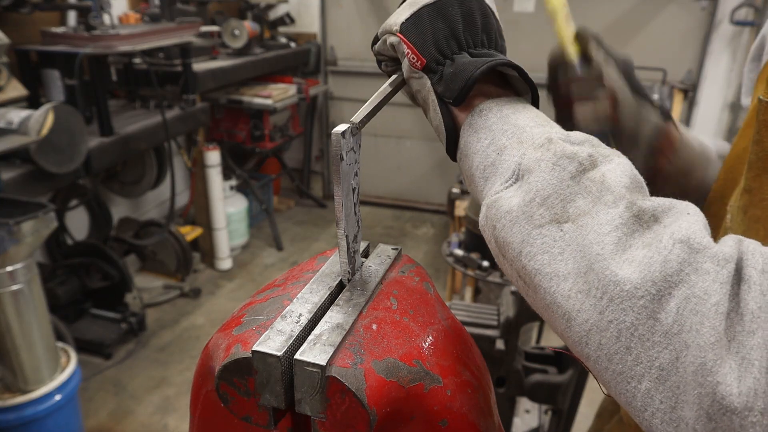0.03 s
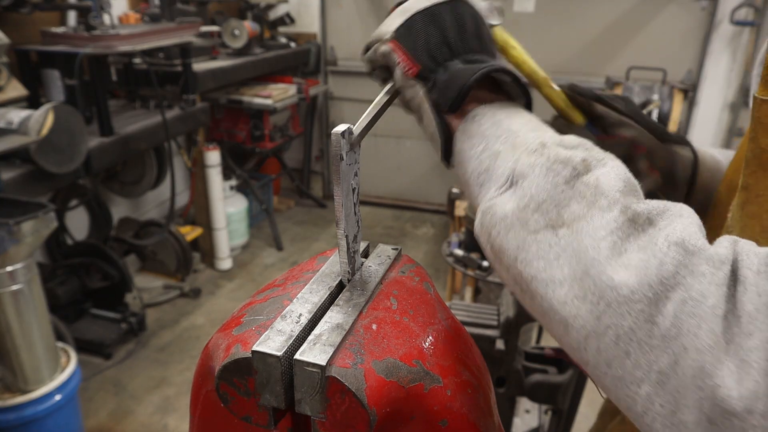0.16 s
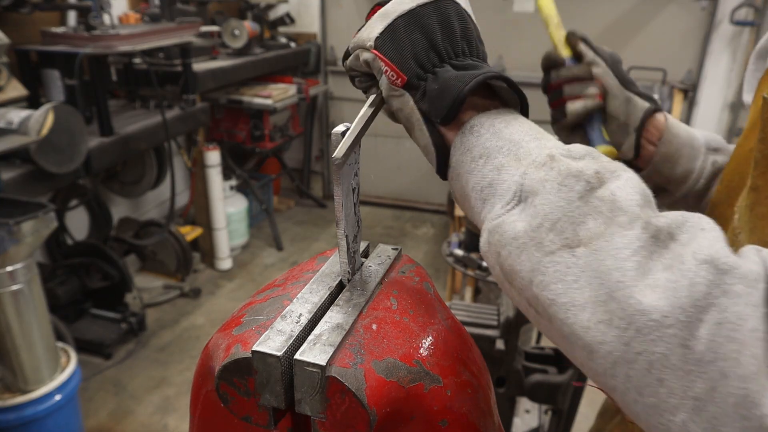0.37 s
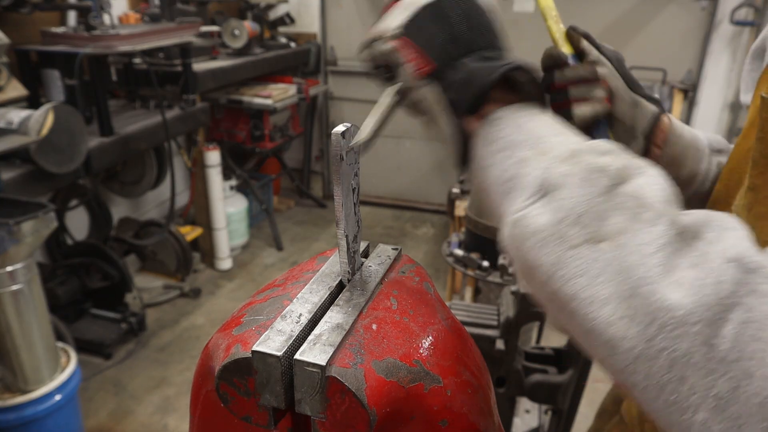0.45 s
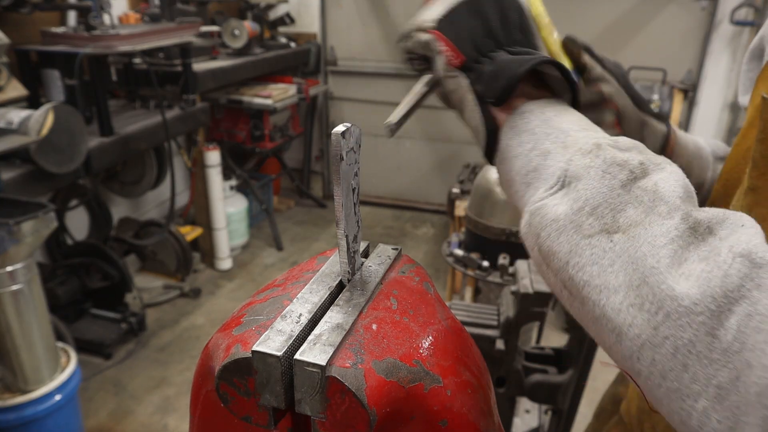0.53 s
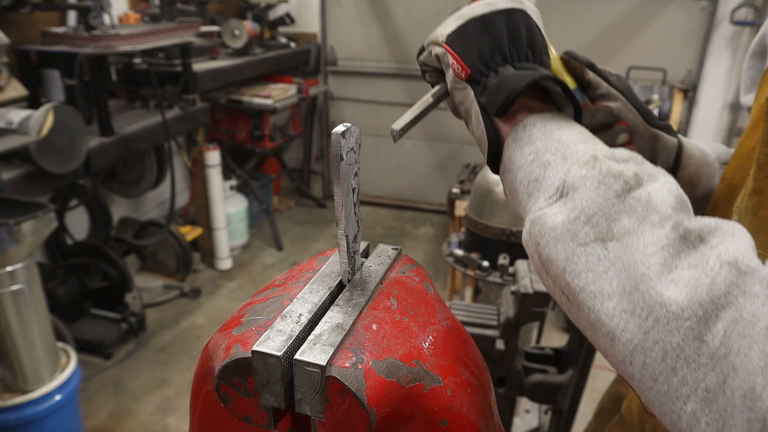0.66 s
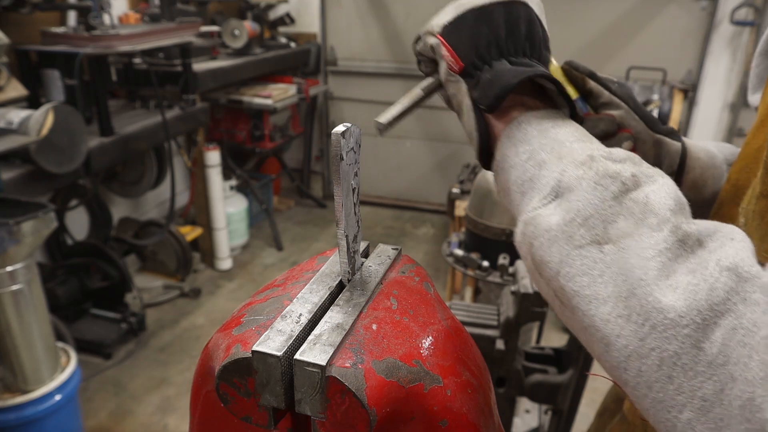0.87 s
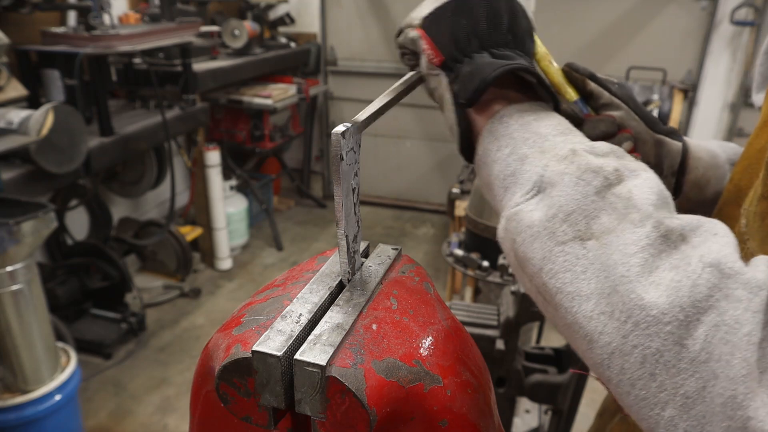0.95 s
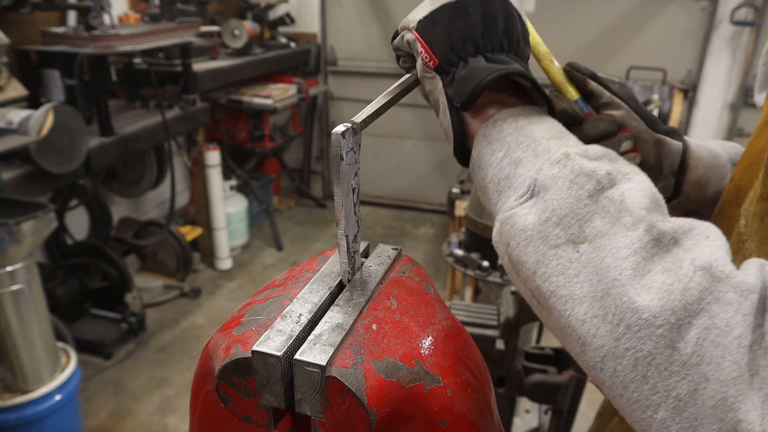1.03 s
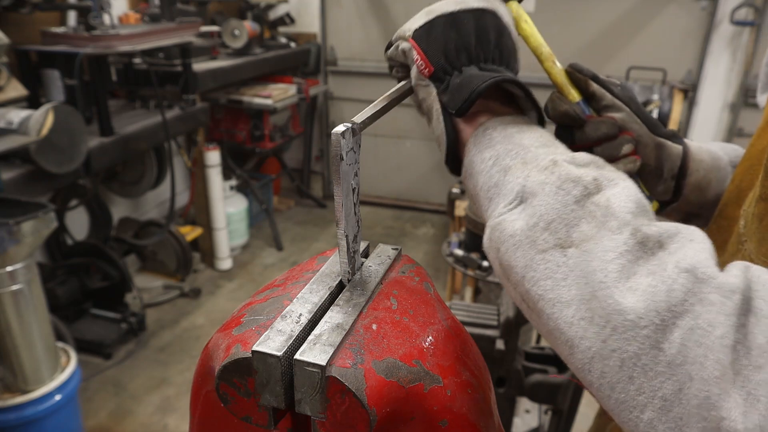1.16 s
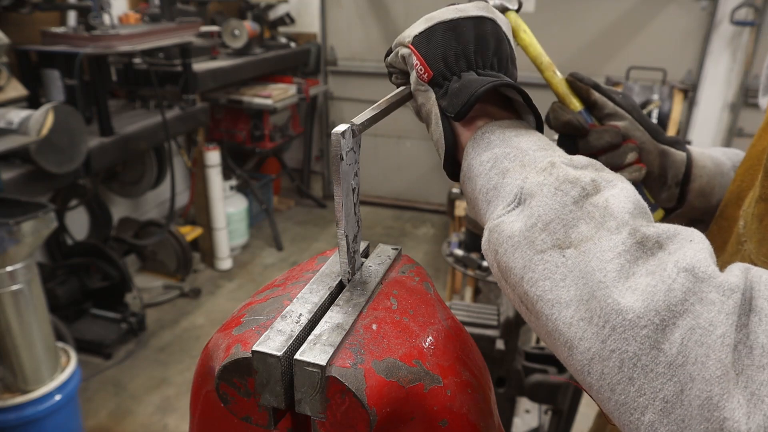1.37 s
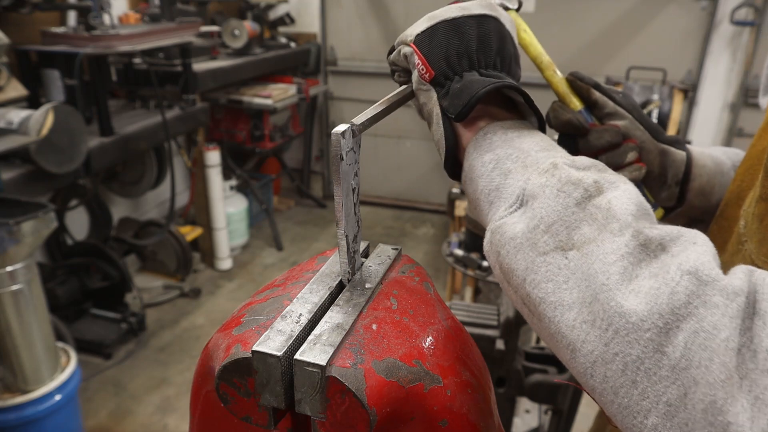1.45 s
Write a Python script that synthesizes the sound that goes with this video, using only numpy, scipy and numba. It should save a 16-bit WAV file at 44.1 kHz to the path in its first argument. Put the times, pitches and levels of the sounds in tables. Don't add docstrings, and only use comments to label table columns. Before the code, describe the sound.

A single hard hammer blow on a chisel against vise-held steel, close and slightly overloaded, rings into a concrete garage; about a second later come a soft knock and a sharper light tap over low hum.

```python
import sys
import numpy as np
from scipy import signal
from scipy.fft import rfft, irfft
from scipy.io import wavfile
from numba import njit

SR = 44100
rng = np.random.default_rng(int(sys.argv[2]) if len(sys.argv) > 2 else 0)


def gain_from_db(level_db):
    decades = np.asarray(level_db, float) / 20
    return 10 ** decades


def output_pcm(signal):
    pcm = np.clip(np.atleast_2d(signal).T, -1, 1) * 32767
    wavfile.write(sys.argv[1], SR, np.round(pcm).astype(np.int16))


N = 66150
T = np.arange(N) / SR

# (t/s, crack level/dB, contact time/s, ring level/dB, room level/dB)
HITS = [
    (0.2041, 13, .0002, -2, -8),
    (1.0722, -26.5, 0.00037, -34, -40.5),
    (1.3034, -11, 0.00027, -34, -37),
]
RING_RISE_S = 0.0021


def curve(points, hz):
    p = np.array(points, float)
    return np.interp(np.log(np.maximum(hz, 1)), np.log(p[:, 0]), p[:, 1])


def colour(points, hz=None, octaves=None):
    f = np.fft.rfftfreq(N, 1 / SR)
    spectrum = rfft(rng.standard_normal(N)) * gain_from_db(curve(points, f))
    spectrum = spectrum / np.std(irfft(spectrum, N))
    if hz:
        distance = np.clip(np.log2((f + 1) / hz) / octaves, -1, 1)
        spectrum = spectrum * np.cos(np.pi / 2 * distance)
    return irfft(spectrum, N)


def fade(start, t60, rise):
    age = np.maximum(T - start, 0)
    return (1 - np.exp(-(age / rise) ** 2)) * 10 ** (-3 * age / t60)


def ring(start, modes, rise, spread_hz=0., count=1):
    partner_db = -2.5
    out, age = 0, T - start
    weight = np.where(np.arange(count) == 0, 1, gain_from_db(partner_db))[:, None]
    for hz, db, t60 in modes:
        detune, phase = rng.random((2, count, 1))
        offset = spread_hz * (1 + hz / 1000) * (detune - .5) * (weight != 1)
        cycles = (hz + offset) * age + phase * (count > 1)
        tone = (weight * np.sin(2 * np.pi * cycles)).sum(axis=0)
        out = out - gain_from_db(db) * fade(start, t60, rise) * tone / np.sqrt(count)
    return out


def puffs(rows, octaves):
    flat = [(20, 0), (20000, 0)]
    out = 0
    for s, db, hz, length in rows:
        swell = np.exp(-((T - s) / length) ** 2)
        noise = colour(flat, hz, octaves) / np.sqrt(hz * octaves / 32000)
        out = out + gain_from_db(db) * swell * noise
    return out


def garage():
    # (f/Hz, level/dB per Hz)
    floor_colour = [(18, -38), (30, -25), (64, 1.5), (93, -14), (597, -17), (1350, -21.5), (1750, -24),
                    (15800, -40)]
    # (f/Hz, level/dB before a common lift of 8.5 dB)
    hum_tones = [(59.2, -71.5), (183.0, -88), (317.6, -82), (608.3, -84)]
    floor_db = -61.5
    out = gain_from_db(floor_db - 4) * colour(floor_colour)
    for hz, db in hum_tones:
        out = out + gain_from_db(db + 8.5) * np.sin(2 * np.pi * (hz * T + rng.random()))
    return out


def stand():
    # (f/Hz, level/dB, t60/s)
    slow_modes = [(132.8, -45.5, 3), (190, -40.5, 3), (841.6, -38, 2.4), (992, -43, 0.3), (1680, -50, 1.2)]
    earlier_blow_s, earlier_db, rise_s = -.9, -10.5, 0.1
    earlier = gain_from_db(earlier_db) * ring(earlier_blow_s, slow_modes, rise_s)
    return earlier + ring(HITS[0][0], slow_modes, rise_s)


def swish():
    # (t/s, level/dB, f/Hz, length/s)
    whistles = [
        (0.07, -70, 1740, 0.052),
        (0.19, -64, 1968, 0.014),
    ]
    return puffs(whistles, 0.18)


def ticks():
    # (t/s, level/dB, f/Hz, length/s)
    cloth_ticks = [
        (0.1185, -60, 3860, 0.00034),
        (1.0722, -63, 8100, 0.00044),
        (1.0745, -57, 5300, 0.0016),
        (1.3018, -43, 5000, 0.00046),
        (1.3042, -57.5, 9900, 0.0013),
        (1.4695, -63.5, 10900, .002),
    ]
    return puffs(cloth_ticks, 1.0)


def reverb(start, room):
    # (f/Hz, t60/s)
    room_decay = [(100, .7), (300, .6), (1000, 0.5), (3000, 0.51), (6000, 0.43),
                  (9000, .3), (12000, .22), (15000, .16)]
    late_db, late_stretch = -26.5, 1.63
    out = 0
    for hz in 60 * 2 ** np.arange(0, 8.6, 1 / 2):
        t60 = curve(room_decay, hz)
        rise = 0.00067 + 2.3 / hz
        tail = fade(start, t60, rise) + gain_from_db(late_db) * fade(start, late_stretch * t60, rise)
        out = out + colour(room, hz, 1 / 2) * tail
    return out


def contact(hit, crack, modes, room):
    # (delay/s, level/dB)
    first_walls = [(.0045, -10.5), (.0092, -13.5), (.0145, -13.5)]
    echo_smear_s, echo_top_hz, ring_t60_max_s = 0.00079, 3000, .5
    s, crack_db, push, ring_db, room_db = hit
    short = [(hz, db, 2.78 / width) for hz, width, db in crack]
    echoes = 0
    for lag, db in first_walls:
        echoes = echoes + gain_from_db(db) * ring(s + lag, short, push + echo_smear_s, 100, count=2)
    dull_echoes = signal.lfilter(*signal.butter(2, echo_top_hz, fs=SR), echoes)
    cracks = ring(s, short, push) + dull_echoes
    held = [(hz, db, min(t60, ring_t60_max_s)) for hz, db, t60 in modes]
    steel = ring(s, held, RING_RISE_S, 22, count=4)
    return gain_from_db(crack_db) * cracks + gain_from_db(ring_db) * steel + gain_from_db(room_db) * reverb(s, room)


def blow():
    # (f/Hz, width/Hz, level/dB)
    crack = [(845, 110, -13.5), (1400, 620, -3.5), (2770, 300, -1), (3715, 150, -7.5), (4755, 200, -6.5),
             (6550, 310, -14.5), (6770, 290, -17.5), (8800, 810, -15.5), (14300, 730, -17.5)]
    # (f/Hz, level/dB, t60/s)
    modes = [(306, -18, 0.61), (429.2, -17, 0.46), (540.8, -4.5, 0.33), (900, -21, 0.32),
             (1000.5, -8, 0.76), (1035, -7, .55), (1290, -17.5, .5), (1493, -15.5, 0.4), (2066, -9.5, 0.63),
             (2188, -11, 0.46), (2366, -19, .4), (2896, -20.5, 0.49), (3480, -20.5, .4)]
    # (f/Hz, level/dB per Hz)
    room = [(50, -52.5), (130, -24), (293, -12), (1030, -6), (3090, -9.5), (6000, -27), (11000, -38),
            (15800, -40)]
    return contact(HITS[0], crack, modes, room)


def vise():
    pitches = (609, 732, 4500, 5990, 7200)
    decays = (.65, .4, .55, .45, .25)
    # (level/dB, one column per pitch)
    wake = [
        (-14.5, -40.5, -35, -50.5, -50),
        (-42, -36, -90, -78, -90),
        (-53, -51, -80, -59, -64),
    ]
    out = 0
    for hit, levels in zip(HITS, wake):
        out = out + ring(hit[0], zip(pitches, levels, decays), RING_RISE_S, 6, count=2)
    return out


def skip():
    # (t/s, tick level/dB, ring f/Hz, ring level/dB, ring t60/s)
    touch = (0.2197, -14, 12580, -22, .09)
    # (f/Hz, level/dB, t60/s)
    lengthwise = [(12580, -40, .4), (14000, -30, .07)]
    s, db, hz, ring_db, t60 = touch
    clicks = puffs([(s, db, 8000, .0007), (s + .007, db - 5, 10000, .002)], 1.2)
    return clicks + ring(s, [(hz, ring_db, t60)] + lengthwise, .006, 8, count=3)


def set_back():
    # (f/Hz, width/Hz, level/dB)
    crack = [(686, 130, -7), (1946, 33, -6.5), (2970, 227, 5.5), (3380, 460, -4.5)]
    # (f/Hz, level/dB, t60/s)
    modes = [(230, -14.5, 0.37), (807, 1, 0.26), (1023, -1.5, 0.15), (1510, 0.5, 0.1), (1980, -8, .2),
             (2650, -10, 0.17), (2970, -14, 0.12)]
    # (f/Hz, level/dB per Hz)
    room = [(100, -29), (230, -4), (450, -14), (750, -6), (2000, -8), (3200, -11.5), (4300, -33),
            (9000, -50)]
    return contact(HITS[1], crack, modes, room)


def tap():
    # (f/Hz, width/Hz, level/dB)
    crack = [(2200, 150, -11.5), (2920, 500, 0), (3860, 760, 3.5), (6050, 140, -21.5), (7700, 420, -36)]
    # (f/Hz, level/dB, t60/s)
    modes = [(241.3, -2.5, 0.45), (320, -12.5, 0.92), (1077, -7.5, 0.45), (1233, -2.5, 0.28),
             (1295, -6, 0.53), (2193, -2.5, .33), (2720, -7.5, 0.1), (4220, -19, 0.45)]
    # (f/Hz, level/dB per Hz)
    room = [(100, -35.5), (240, 2.5), (700, -4), (1300, -0.5), (3100, 0.5), (4500, -12.5), (6500, -23.5),
            (9000, -40)]
    return contact(HITS[2], crack, modes, room)


def scene():
    before = garage() + stand() + swish() + ticks()
    hits = blow() + vise() + skip() + set_back() + tap()
    return (before + hits)[None]


@njit
def follow(x, up, down):
    level, out = 0., np.empty(len(x))
    for i in range(len(x)):
        level += (x[i] - level) * (up if x[i] > level else down)
        out[i] = level
    return out


def roll_off(x):
    return signal.sosfilt(signal.butter(12, 15980, fs=SR, output="sos"), x)


def record(dry):
    mic_low_hz, top_hz = 54, 15900
    duck_top_db, duck_ratio, duck_attack_s, duck_release_s = -11, 12, 0.0031, .06
    clip_hard, clip_db = 2.7, -0.37
    dry = signal.lfilter(*signal.butter(3, mic_low_hz, "high", fs=SR), dry)
    level = follow(np.abs(dry[0]), 1 / (duck_attack_s * SR), 1 / (duck_release_s * SR))
    gain = np.minimum(gain_from_db(duck_top_db) / (level + 1e-9), 1) ** (1 - 1 / duck_ratio)
    x = dry * gain
    x = gain_from_db(clip_db) * x / (1 + np.abs(x) ** clip_hard) ** (1 / clip_hard)
    x = signal.lfilter(*signal.butter(2, 40, "high", fs=SR), x)
    x = signal.sosfilt(signal.ellip(10, .2, 80, top_hz, fs=SR, output="sos"), x)
    return roll_off(x)


dry = scene()
out = record(dry)
output_pcm(out)
```